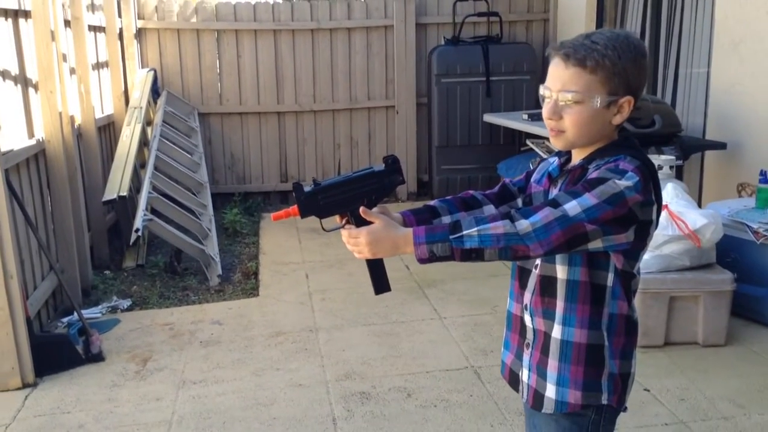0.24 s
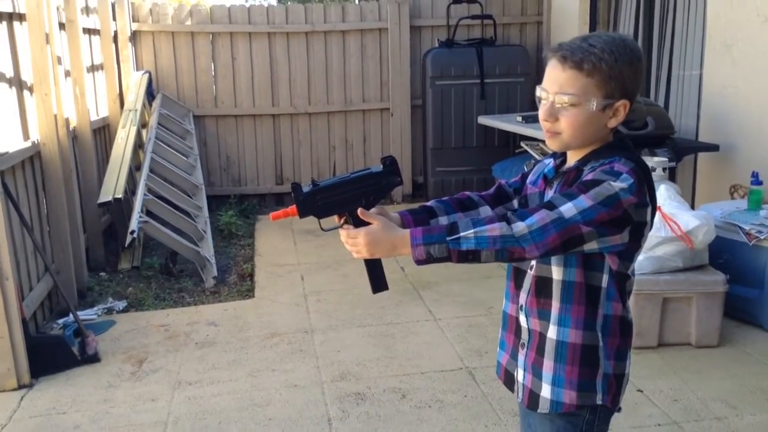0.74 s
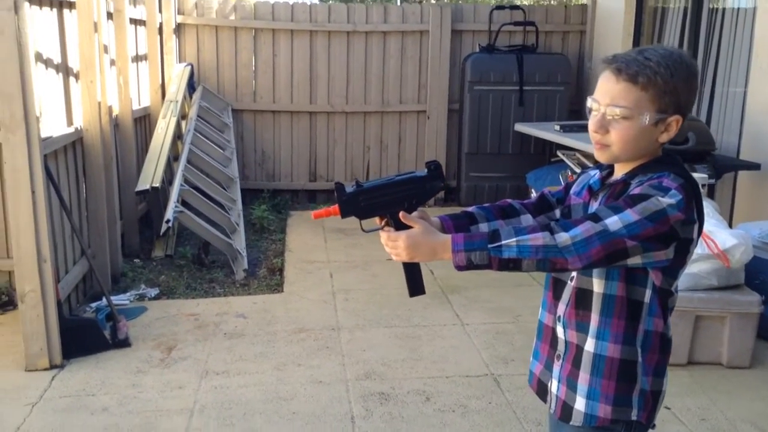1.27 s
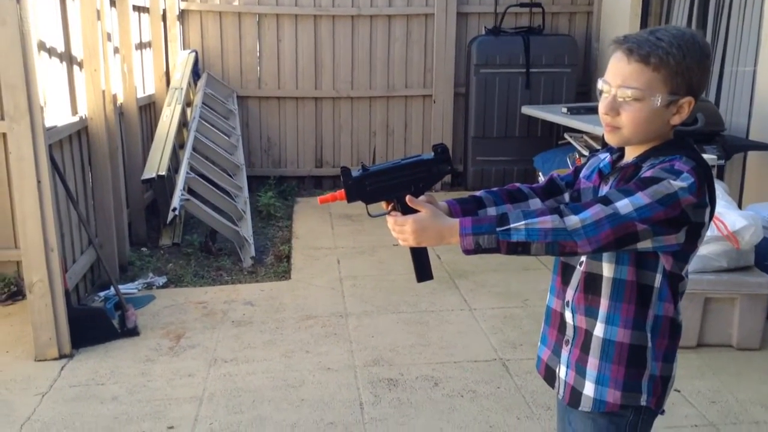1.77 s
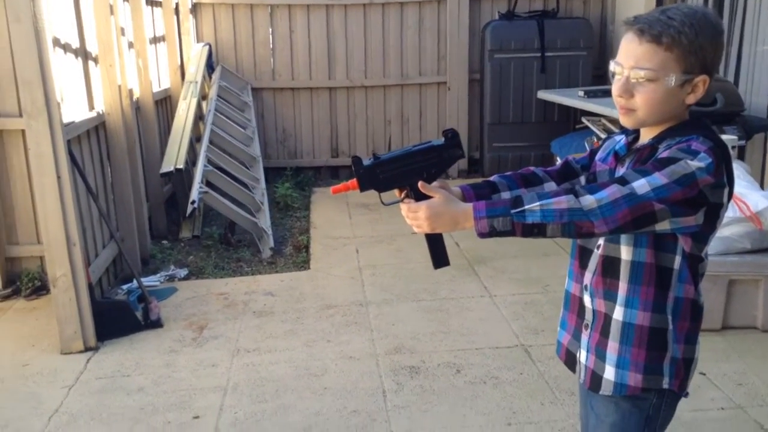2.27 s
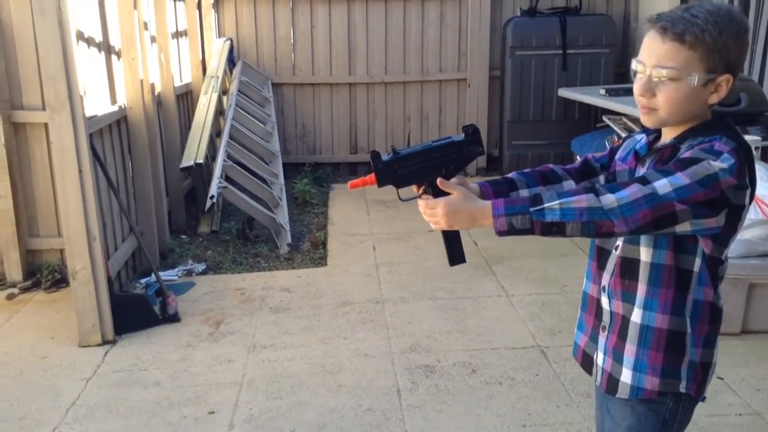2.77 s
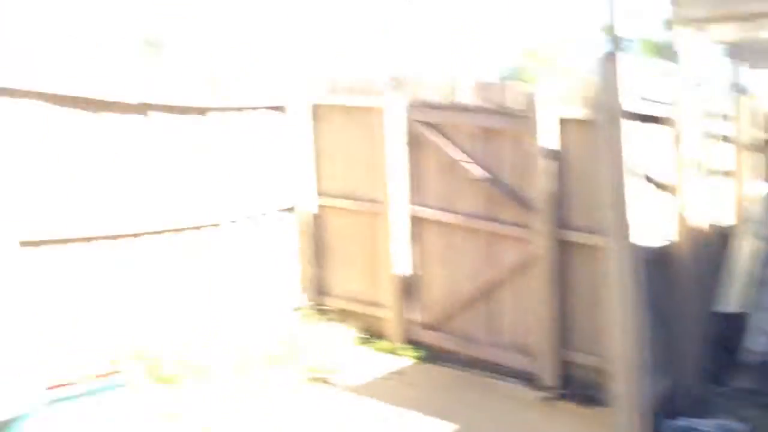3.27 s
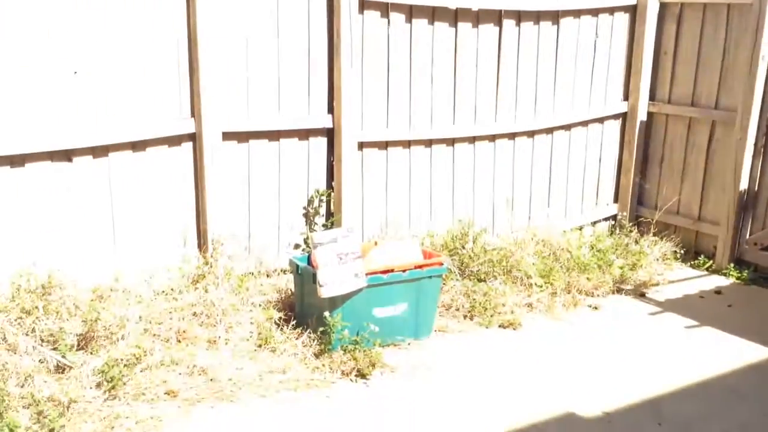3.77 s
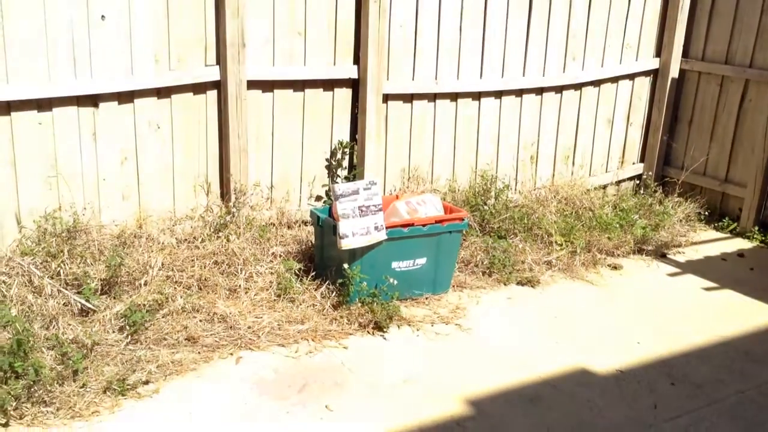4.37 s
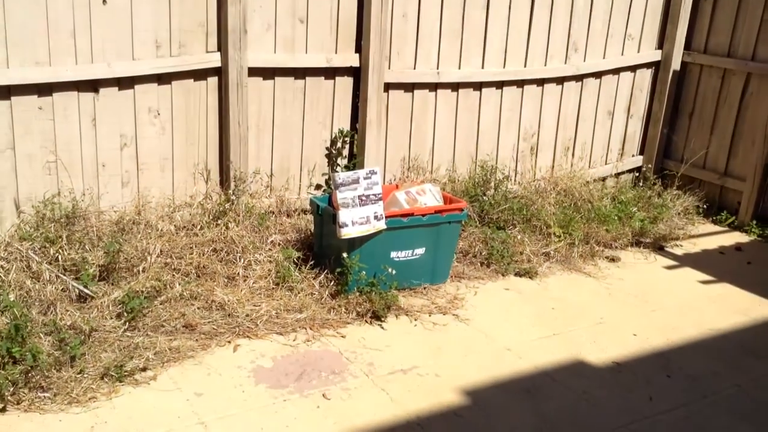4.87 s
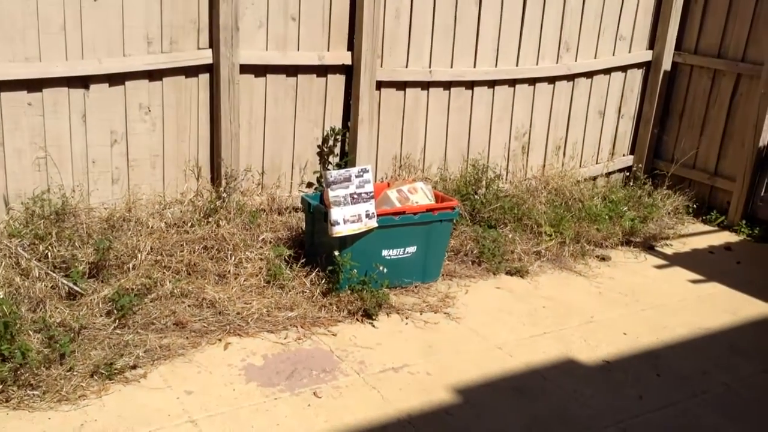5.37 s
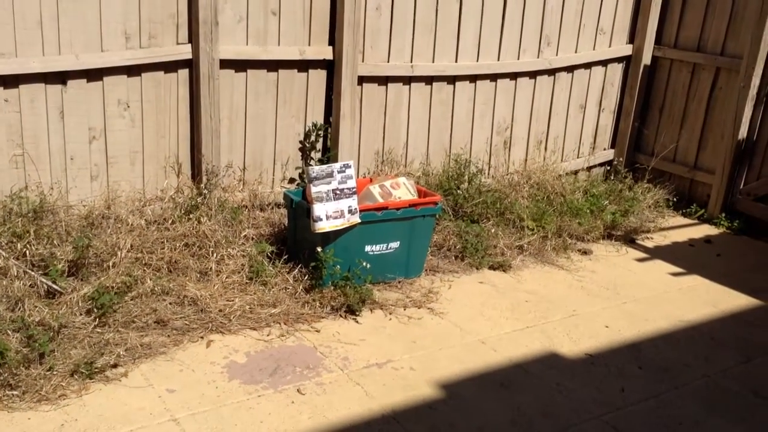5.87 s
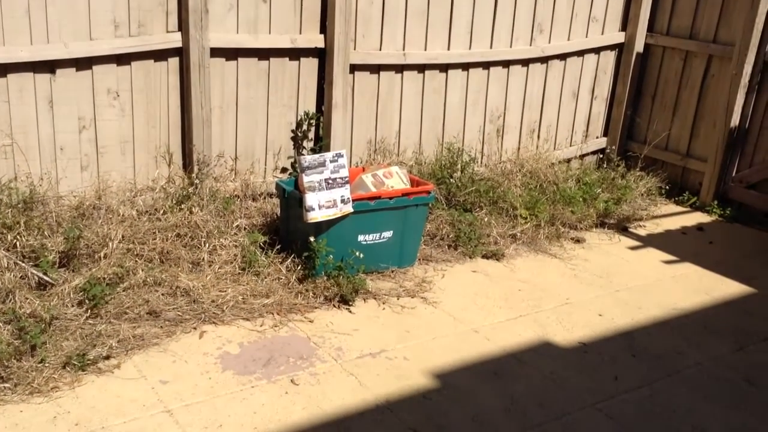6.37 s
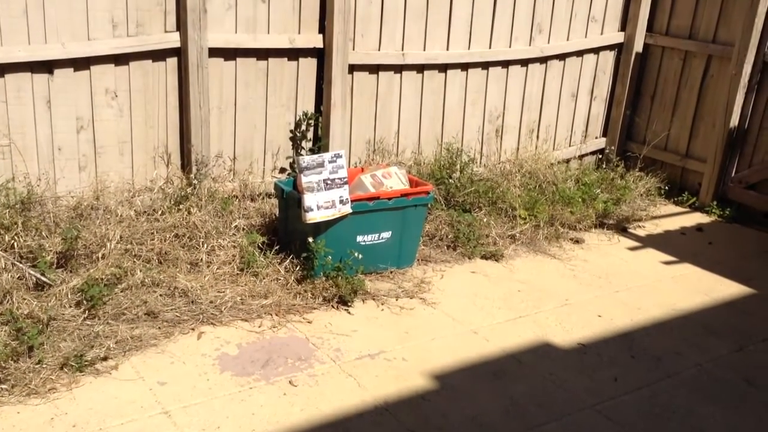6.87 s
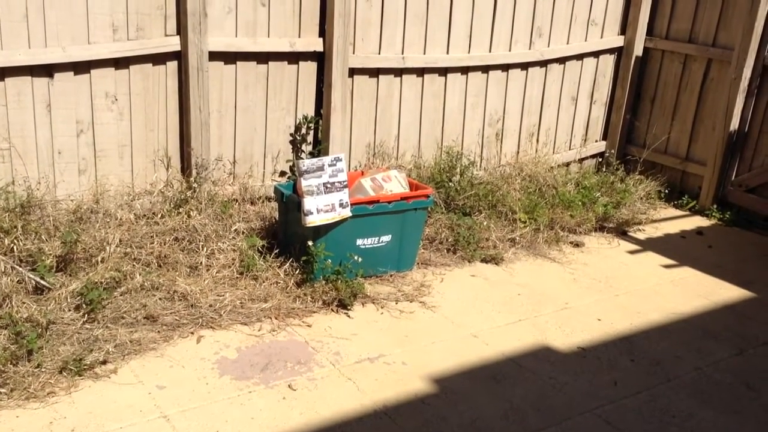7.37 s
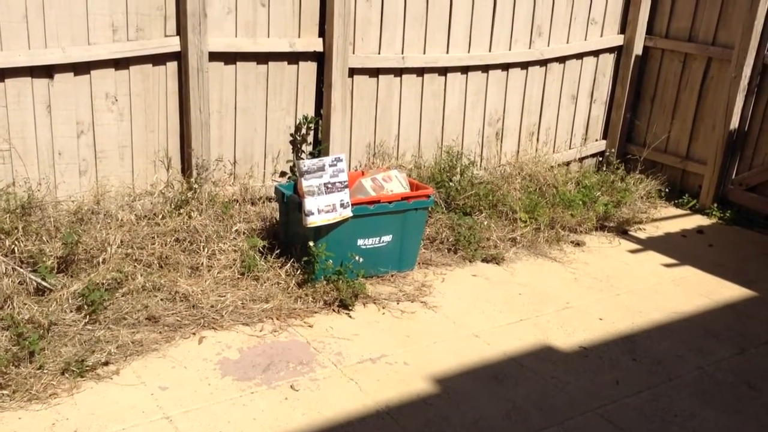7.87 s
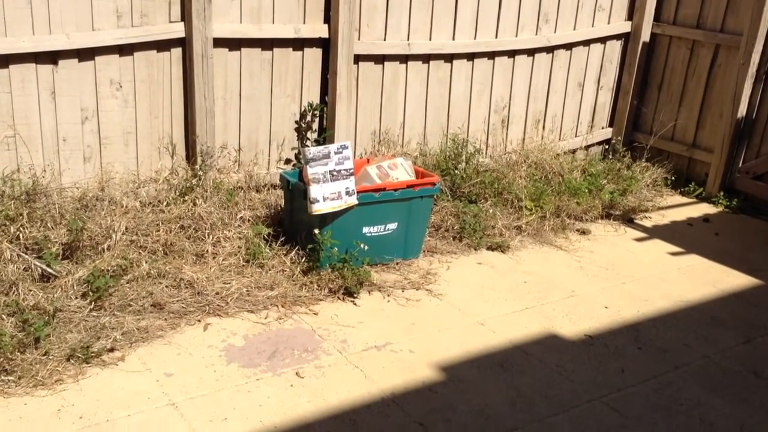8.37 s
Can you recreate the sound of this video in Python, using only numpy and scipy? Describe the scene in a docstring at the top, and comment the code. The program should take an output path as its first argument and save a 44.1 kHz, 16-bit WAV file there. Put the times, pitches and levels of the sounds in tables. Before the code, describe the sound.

An electric toy pellet gun rattles through a long full-auto burst, pauses with small ticks and a shoe scuff, then fires a shorter burst outdoors.

```python
"""A fenced, paved yard, a mono phone close to an electric airsoft gun, far traffic humming underneath.
The first full-auto burst runs about 9.5 shots a second: gears whine and rasp as they draw the piston,
it lets go with a clack and slams home with a puff of air; now and then a rough stroke skips and grinds.
The phone turns away about two thirds through that burst. In the pause loose plastic ticks, a shoe scuffs
the paving and something squeaks faintly; then a shorter second burst. Fence and house wall answer it all."""
import sys
import numpy as np
from scipy import signal
from scipy.fft import rfft, irfft, next_fast_len
from scipy.io import wavfile
from scipy.ndimage import uniform_filter1d, minimum_filter1d, map_coordinates

SR = 44100
rng = np.random.default_rng(int(sys.argv[2]) if len(sys.argv) > 2 else 0)


def put_to_file(sound):
    """Save the sound as 16-bit audio at rate SR, in the file named by the first command-line argument."""
    columns = np.atleast_2d(sound).T  # one column per channel
    safe = np.clip(columns, -1, 1)
    whole_steps = np.round(safe * 32767)
    wavfile.write(sys.argv[1], SR, whole_steps.astype(np.int16))


N = 380141


def amp(db):
    """The amplitude factor of a level in dB."""
    return 10 ** (np.asarray(db) / 20)


def unit(x):
    """x scaled to an RMS of one."""
    return x / np.sqrt(np.mean(x ** 2) + 1e-20)


def along(points, hz):
    """Values of a (frequency [Hz], value) table, read on a log frequency axis."""
    f, v = np.transpose(points)
    return np.interp(np.log(hz + 1), np.log(f + 1), v)


def curves(rows, t):
    """Each column after the first, read at the times t."""
    s, *columns = np.transpose(rows)
    return [np.interp(t, s, column) for column in columns]


def wobble(rate):
    """A smooth random curve, rate knots a second."""
    knots = rng.standard_normal(int(N * rate / SR) + 4)
    return map_coordinates(knots, [np.arange(N) * rate / SR])


def causal(gain):
    """The minimum-phase response that has this gain, found by folding its cepstrum."""
    cepstrum = irfft(np.log(np.maximum(gain, 1e-6)))
    half = len(cepstrum) // 2
    cepstrum[1:half] *= 2
    cepstrum[half + 1:] = 0
    return np.exp(rfft(cepstrum))


def coloured(x, gain, size=8192):
    """x through a causal filter that keeps the power of white noise."""
    hz = np.fft.rfftfreq(size, 1 / SR)
    response = irfft(causal(unit(gain(hz))))
    return signal.fftconvolve(x, response)[:len(x)]


def shape(points):
    """The gain of a (frequency [Hz], relative level [dB]) spectrum."""
    return lambda hz: amp(along(points, hz))


def add(track, s, sound):
    """Lay a sound into the track at s seconds."""
    part = track[max(round(s * SR), 0):][:len(sound)]
    part += sound[:len(part)]


def blend(same, fresh, share):
    """A repeating pattern with a share of new chance in its power."""
    share = np.clip(share, 0, 1)
    return np.sqrt(1 - share) * same + np.sqrt(share) * fresh


# the phone swings away from the gun: (time [s], share of the turn [0 to 1])
PHONE_TURN = [(3.1, 0.046), (3.35, 1)]


def turned_away(t):
    """How far the phone has turned from the gun at the times t."""
    return curves(PHONE_TURN, t)[0]


# soft outdoor rush: (frequency [Hz], relative level [dB per Hz])
RUSH_SPECTRUM = [(30, -39), (90, -18), (130, -3.5), (190, -2.5), (330, -4.5), (700, -0.5), (1200, -7.5),
                 (2100, -16.5), (4000, -11), (7000, -22), (10000, -33), (15000, -41)]
# far traffic: (frequency [Hz], relative level [dB per Hz])
TRAFFIC_SPECTRUM = [(60, -33), (105, -14.5), (140, -3), (190, 0.5), (270, -5.5), (400, -12), (900, -42)]


def background():
    """The soft rush of the neighbourhood over the hum of far traffic, each a slowly swaying noise."""
    noise = lambda points: unit(coloured(rng.standard_normal(N), shape(points)))
    rush = amp(-51.5 + 0.89 * wobble(4)) * noise(RUSH_SPECTRUM)
    traffic = amp(-61.0 + wobble(1.9)) * noise(TRAFFIC_SPECTRUM)
    return rush + traffic


# the trigger is held: (motor on [s], first slam [s], motor off [s])
TRIGGER_PULLS = [(0, .0143, 4.88), (6.36, 6.392, 8.65)]
# the motor's pace drifts a little: (time [s], rate [shots per s])
SHOT_RATE = [(0, 9.613), (.9, 9.549), (1.6, 9.601), (3.2, 9.555), (4.8, 9.544), (6.39, 9.306), (6.6, 9.525),
             (8.2, 9.449), (8.5, 9.61)]


def slam_times():
    """One slam for each turn of the sector gear while the trigger is held."""
    times = []
    for _, s, off_s in TRIGGER_PULLS:
        while s < off_s:
            times.append(s)
            s += 1 / curves(SHOT_RATE, s)[0]
    return np.array(times)


# rough strokes: gear skips, a slam that knocks the frame (2.098), and the second burst's first
# release (6.36); levels relative: (time [s], clack [dB], grinding [dB], low knock [dB],
# change of the gears just before it [dB])
ROUGH_STROKES = [(.093, -5, -3.5, -35, -1.5), (1.344, 4.5, -2, -27, -2.5), (1.448, -2, -5, -35, -3),
                 (1.551, 3, -3.5, -33, -2), (1.657, -1, -5, -36, -4.5), (1.76, -4, 0, -35, -4),
                 (1.974, -1.5, -16, -37, 0.5), (2.077, 0, -8, -36.5, -5.5), (2.098, -6, -12, -37, 2.5),
                 (2.183, -7, -16, -64, -0.5), (3.223, 4.5, -7, -33.5, -3), (6.36, -3.5, -13, -33.5, 0),
                 (6.466, -9, -2.5, -49, -4.5), (8.394, 0.5, -3, -48, -4.5)]
RUN_DOWN_DB_PER_S = 285  # the gears fade when the trigger is let go
CHANGE_S = .075  # how long before a rough stroke the gears' level changes


def motor_gain(t):
    """The gears sound while the trigger is held, run down after, and change level before rough strokes."""
    running = 0
    for on_s, _, off_s in TRIGGER_PULLS:
        running = running + (t >= on_s) * amp(-RUN_DOWN_DB_PER_S * np.maximum(t - off_s, 0))
    change_db = sum(db * ((t > s - CHANGE_S) & (t < s)) for s, *_, db in ROUGH_STROKES)
    return running * amp(change_db)


# modes of gearbox and plastic shell, levels relative:
# (centre [Hz], width [Hz], driven by the release [dB], by the slam [dB], by the gears [dB])
SHELL_MODES = [(360, 360, -18.5, -23.5, -25), (563, 78, -16, -8, -32), (812, 450, -10, -10, -17.5),
               (1010, 256, -10.5, -5.5, -14), (1302, 460, -19, -12.5, -14.5), (1630, 400, -7, -11.5, -14.5),
               (1890, 370, -5.5, -10.5, -17), (2327, 590, -5, -6.5, -8.5), (2682, 240, 0, -13.5, -8.5),
               (3126, 790, -18.5, -2, -7), (3350, 340, 3, -26, -12), (3617, 166, -5.5, 0, 1),
               (4240, 790, -2, -2.5, -5), (3946, 126, 0, -9.5, -0.5), (4586, 1100, -20, -2.5, -10.5),
               (5250, 300, -2.5, -5.5, -20), (5770, 360, -0.5, -1, -29), (5710, 2330, -18, -7, -10),
               (6840, 580, -3, -8, -19), (7330, 460, -29, -5, -13), (9160, 950, -18, -13, -31),
               (9490, 340, -22, -25, -16), (10500, 2100, -15.5, -13, -32.5), (12160, 680, -9, -9.5, -25),
               (14000, 430, -23, -14, -42), (14700, 1100, -19, -16, -36)]


def shell(drive, lowest_hz=170):
    """The gain of the shell's modes under one kind of drive; so small a body radiates little bass."""
    centre, width, *levels = np.transpose(SHELL_MODES)
    db = dict(zip(("release", "slam", "gears"), levels))[drive]

    def gain(hz):
        f = hz[:, None] + 1
        detune = (f * f - centre ** 2) / (f * width)
        modes = np.linalg.norm(amp(db) / (1 + detune ** 2), axis=1)
        return modes * hz ** 2 / (hz ** 2 + lowest_hz ** 2)
    return gain


# one draw of the piston, levels relative:
# (time after the slam [s], whine pitch [Hz], whine [dB], mesh [dB], rack rasp [dB])
PISTON_DRAW = [(0, 4100, -41, -18.5, -17.5), (.009, 3890, -20, -23.5, -26.5), (.02, 3880, -17.5, -22, -25),
               (.04, 4040, -18.5, -19.5, -25), (.058, 4230, -22, -21.5, -48), (.068, 4150, -39, -24.5, -63),
               (.084, 4050, -20, -23, -35), (.105, 4100, -31, -21.5, -25)]
# rack teeth sliding: (frequency [Hz], relative level [dB per Hz])
RASP_SPECTRUM = [(300, -32.5), (3000, -6), (5000, -18), (6000, 8), (7300, 5.5), (8100, -1.5), (9400, -0.5),
                 (11400, -7), (12300, 1.5), (13600, -11), (15000, -21)]
# the shaken frame: (frequency [Hz], relative level [dB per Hz])
KNOCK_SPECTRUM = [(50, -52), (150, -21.5), (240, 0.5), (350, -7.5), (470, 3.5), (560, 3), (800, -10),
                  (2000, -44.5)]


def gears(fresh=0.4, shaft_hz=228, shaft_db=-1.5, tooth_db=2, cycle_s=.1055, slop_s=.00012,
          flutter_rad=1.15, frame_fresh=0.11):
    """The same teeth meet in every cycle, so the same rattle repeats; the spring's load bends the whine."""
    n = np.arange(N)
    t = n / SR
    starts = np.round(slam_times() * SR).astype(int)
    latest = np.maximum(np.searchsorted(starts, n, "right") - 1, 0)
    since = n - starts[latest]
    # play in the gear train makes each draw run a little early or late
    step = np.round(since + slop_s * SR * wobble(25)).astype(int) % round(cycle_s * SR)
    whine_hz, whine_db, mesh_db, rasp_db = curves(PISTON_DRAW, t)
    turned = turned_away(t)
    # the pinion bites harder once a turn, and every tooth has its own size
    bite = unit(amp(shaft_db * np.sin(2 * np.pi * shaft_hz * t) + tooth_db * wobble(1800)))
    # each side of the gun has its own rattle
    repeating = lambda pattern: blend(pattern()[step], pattern()[step], turned)
    hiss = lambda: rng.standard_normal(N)
    teeth = lambda db, share=fresh: (bite * amp(db))[step] * blend(repeating(hiss), hiss(), share)

    mesh = coloured(teeth(mesh_db), shell("gears"))
    rasp = coloured(teeth(rasp_db), shape(RASP_SPECTRUM))
    frame = coloured(teeth(mesh_db, frame_fresh), shape(KNOCK_SPECTRUM)) * amp(-27.5 - 3.5 * turned)

    # uneven teeth roughen the whine in level and phase
    flutter = lambda: unit(amp(4.8 * wobble(260))) * np.exp(1j * flutter_rad * wobble(480))
    tone = bite * amp(whine_db) * np.exp(2j * np.pi * np.cumsum(whine_hz) / SR)
    drifting = flutter() * np.exp(2j * wobble(40))
    whine = (tone[step] * blend(repeating(flutter), drifting, fresh)).real
    return motor_gain(t) * (amp(-0.5) * mesh + amp(-2.5) * rasp + amp(-1.5) * whine + frame)


def chatter(t60, rise_s=0.00045, size=2048):
    """One contact, scattered in time inside the gearbox but nearly flat in spectrum."""
    t = np.arange(size) / SR
    envelope = amp(-60 * t / t60) * (1 - np.exp(-t / rise_s))
    z = rfft(rng.standard_normal(size) * envelope)
    burst = irfft(z / abs(z)) * np.sqrt(envelope)
    return burst / np.linalg.norm(burst)


# colour of the blows while the phone faces the gun: (frequency [Hz], relative level [dB])
FACING_COLOUR = [(300, -2), (430, -1.5), (560, -6), (720, 1.5), (900, -4.5), (1400, 0.5), (3200, -1.5),
                 (3900, 7), (5000, 0), (6300, 0.5), (7000, -4.5), (8700, 7.5), (10700, -10.5),
                 (12200, -13.5), (14800, 0.5)]


def blows(rows, drive, t60, fresh, bounce_s, bounce_db):
    """Nearly alike contacts that ring the shell, each followed by its bounce off the paving."""
    facing, away = np.zeros(N), np.zeros(N)
    facing_pattern, away_pattern = chatter(t60), chatter(t60)
    for s, db in rows:
        turned = turned_away(s)
        facing_blow = blend(facing_pattern, chatter(t60), fresh)
        away_blow = blend(away_pattern, chatter(t60), fresh)
        add(facing, s, amp(db) * np.sqrt(1 - turned) * facing_blow)
        add(away, s, amp(db) * np.sqrt(turned) * away_blow)
    contacts = amp(-1.5) * coloured(facing, shape(FACING_COLOUR)) + away
    direct = coloured(contacts, shell(drive))
    bounce = np.zeros(N)
    add(bounce, bounce_s, signal.fftconvolve(direct, chatter(0.0034))[:N])
    return direct + amp(bounce_db) * bounce


# air from the muzzle: (frequency [Hz], relative level [dB per Hz])
PUFF_SPECTRUM = [(15, -9), (30, 0), (90, 1.5), (160, -3), (300, -9), (600, -43)]


def puffs(rows):
    """The air that each stroke of the piston pushes out of the muzzle."""
    pushes = np.zeros(N)
    for s, db in rows:
        add(pushes, s, amp([db]))
    return amp(25) * coloured(pushes, shape(PUFF_SPECTRUM))


FLIGHT_S = .0204  # the piston flies from its release to the cylinder head
RELEASE_SCATTER_DB, SLAM_SCATTER_DB, PUFF_SCATTER_DB = 1.05, 2.4, 2  # from shot to shot
THUMP_DB = -46  # relative level of a felt puff, on the scale of the ordinary puffs
SAME_SHOT_S = .04  # events this near a slam belong to it
# strength of an ordinary shot, levels relative: (time [s], release [dB], slam [dB], air puff [dB])
SHOT_STRENGTH = [(0, -6, 3, -55), (1.8, -6.5, 2.5, -60), (3.1, -6.5, .5, -58), (3.5, -4.5, 2.5, -55),
                 (4.8, -7.5, 2.5, -57), (6.8, -5.5, 1, -56), (8.5, -7, -1.5, -48)]
# shots whose puff of air is felt as a thump: (time [s])
THUMP_TIMES = [.33, .43, .74, 1.16, 1.68, 1.89, 2.62, 3.04, 3.46, 4.72, 6.5, 7.34, 7.76, 8.4]


def piston():
    """In each shot: the clack of the release, the sharper slam 20 ms later, and a puff from the muzzle."""
    slam_s = slam_times()
    scatter = [RELEASE_SCATTER_DB, SLAM_SCATTER_DB, PUFF_SCATTER_DB]
    scatter_db = rng.standard_normal((len(slam_s), 3)) * scatter
    release_db, slam_db, puff_db = np.array(curves(SHOT_STRENGTH, slam_s)) + scatter_db.T
    rough = np.array(ROUGH_STROKES)[:, :2]
    among = lambda times: abs(slam_s[:, None] - times).min(axis=1) < SAME_SHOT_S
    puff_db = np.where(among(THUMP_TIMES), THUMP_DB, puff_db)
    # the clack of a rough stroke takes the place of the ordinary release
    clean = ~among(rough[:, 0]) & (slam_s > FLIGHT_S)
    ordinary = np.column_stack([slam_s - FLIGHT_S, release_db])[clean]
    releases = np.vstack([ordinary, rough])
    clack = blows(releases, "release", t60=0.013, fresh=0.28, bounce_s=0.0047, bounce_db=-10)
    slam = blows(zip(slam_s, slam_db), "slam", t60=0.0059, fresh=0.33, bounce_s=.0044, bounce_db=-12.0)
    return amp(17.0) * clack + amp(14.5) * slam + puffs(zip(slam_s, puff_db))


# the clear tone of the gear mesh in each draw: its start after the slam, and its length
SING_START_S, SING_S = .012, 0.058
SING_HZ, SING_RISE_HZ_PER_S = 3720, 10000  # starting pitch and glide
SING_DB, SING_AWAY_DB = -27, 5  # its level, and the change once the phone has turned


def singing(sideband=0.83, shaft_hz=228, waver_rad=0.46):
    """The pinion's mesh tone with sidebands from the turning shaft; the motor gains speed in each draw."""
    track, t = np.zeros(N), np.arange(round(SING_S * SR)) / SR
    swell = np.sin(np.pi * t / SING_S) ** 0.73
    mesh = 2 * np.pi * (SING_HZ * t + SING_RISE_HZ_PER_S * t ** 2 / 2)
    slam_s = slam_times()
    phases = rng.uniform(0, 2 * np.pi, (len(slam_s), 2))
    for s, (tooth, shaft) in zip(slam_s, phases):
        turning = 1 + sideband * np.cos(2 * np.pi * shaft_hz * t + shaft)
        add(track, s + SING_START_S, swell * np.sin(mesh + tooth) * turning)
    now = np.arange(N) / SR
    analytic = signal.hilbert(track, next_fast_len(N))[:N]
    wavering = (analytic * np.exp(1j * waver_rad * wobble(250))).real
    return motor_gain(now) * amp(SING_DB + SING_AWAY_DB * turned_away(now)) * wavering


def grinding(rattle_t60=0.21, knock_t60=0.46, size=12000):
    """Each rough stroke rattles the shell and shakes the whole frame with fading, grainy noise."""
    rattle, knock, t = np.zeros(N), np.zeros(N), np.arange(size) / SR
    for s, _, db, knock_db, _ in ROUGH_STROKES:
        add(rattle, s, amp(db - 60 * t / rattle_t60))
        add(knock, s, amp(knock_db - 60 * t / knock_t60))
    grains = lambda: unit(rng.standard_normal(N) * amp(3.4 * wobble(600)))
    shell_rattle = coloured(rattle * grains(), shell("slam"))
    frame_knock = coloured(knock * grains(), shape(KNOCK_SPECTRUM))
    return amp(-13.5) * shell_rattle + amp(-3) * frame_knock


# loose plastic parts settle: (time [s], relative level [dB])
SETTLING_TICKS = [(4.978, -20), (5.18, -34), (5.2455, -38), (5.883, -35), (5.96, -38)]


def ticks():
    """Small plastic contacts ring the shell while the gun rests."""
    track = np.zeros(N)
    for s, db in SETTLING_TICKS:
        add(track, s, amp(db) * chatter(0.0306))
    return amp(13) * coloured(track, shell("release"))


RUB_RISE_DB_PER_S, RUB_FALL_DB_PER_S = 327, 139
# the sole pushes over the grit: (time of the peak [s], level [dB])
SOLE_RUBS = [(5.25, -40.5), (5.33, -31.5), (5.398, -27.5), (5.485, -29.5), (5.534, -27.5), (5.662, -34.5),
             (5.888, -48), (6.0, -54)]
# grit under the sole: (frequency [Hz], relative level [dB per Hz])
GRIT_SPECTRUM = [(710, -53), (1200, -17), (1590, -21), (2030, -15), (2480, -5.5), (3730, -4.5), (4200, 0),
                 (4980, -4), (5310, 0), (6370, -5.5), (7090, -2), (8600, -12.5), (12500, -11), (15500, -21)]


def scuff(grain_db=3.0, slip_db=1.5):
    """Grit catches and slips under a sole; each push swells fast and fades more slowly."""
    t = np.arange(N) / SR
    push = lambda s, db: db - np.maximum(RUB_RISE_DB_PER_S * (s - t), RUB_FALL_DB_PER_S * (t - s))
    level_db = np.max([push(s, db) for s, db in SOLE_RUBS], axis=0)
    grains = rng.standard_normal(N) * amp(grain_db * wobble(2500) + slip_db * wobble(130))
    return amp(level_db) * unit(coloured(grains, shape(GRIT_SPECTRUM)))


# thin tones of a faint squeak: (time [s], length [s], pitch [Hz], level [dB], waver [rad])
SQUEAK_TONES = [(6.13, 0.046, 3720, -53, .6), (6.138, 0.092, 2300, -52, 1.6), (6.138, .1, 4210, -51, 0.9),
                (6.264, .1, 3340, -58, .3)]


def squeak(waver_rate=330):
    """A few thin tones, unsteady in phase, that swell and fade."""
    t, track = np.arange(N) / SR, np.zeros(N)
    for s, length, hz, db, waver in SQUEAK_TONES:
        swell = np.sqrt(abs(np.sin(np.pi * np.clip((t - s) / length, 0, 1))))
        track += amp(db) * swell * np.sin(2 * np.pi * hz * t + waver * wobble(waver_rate))
    return track


# decay of the yard's echoes: (frequency [Hz], time to fall by 60 dB [s])
YARD_DECAY = [(200, 0.095), (1000, 0.77), (4000, 0.43), (8000, 0.32), (15000, 0.36)]


def yard(x, delay_s=.008):
    """Fence and house wall scatter the sound back; lows die first, and treble dies before the mids."""
    hz, t, z = signal.stft(rng.standard_normal(SR // 2), SR, nperseg=256)
    fading = z * amp(-60 * t / along(YARD_DECAY, hz)[:, None])
    tail = signal.istft(fading, SR, nperseg=256)[1]
    echo = np.zeros(N)
    add(echo, delay_s, signal.fftconvolve(x, tail / np.linalg.norm(tail))[:N])
    return echo


# colour of the gun once the phone has turned away: (frequency [Hz], relative level [dB])
AWAY_COLOUR = [(70, 1.5), (190, -5), (295, 4.5), (400, -3.5), (480, -4.5), (560, 1), (720, -2), (1000, 0),
               (1800, 0), (3100, -1), (3800, -0.16), (6000, 1), (12000, -0.5)]


def scene():
    """The gun and the small sounds near it, heard directly and off the fences, alike in both channels."""
    turned = turned_away(np.arange(N) / SR)
    gun = gears() + piston() + singing() + grinding() + ticks()
    gun = (1 - turned) * gun + turned * amp(-0.15) * coloured(gun, shape(AWAY_COLOUR))
    near = gun + scuff() + squeak()
    echoes = blend(yard(near), yard(near), turned)  # the turned phone hears other echoes
    mono = near + amp(-8.5) * echoes + background()
    return np.array([mono, mono])


def record(dry, hold_s=0.0013, ceiling=.76, top_hz=15500):
    """The phone's limiter holds down the sharpest peaks; nothing is kept above its band limit."""
    span = 2 * max(round(hold_s * SR / 2), 1) + 1
    needed = np.minimum(1, ceiling / (abs(dry) + 1e-9))
    held = minimum_filter1d(needed, span, axis=-1)
    limited = dry * uniform_filter1d(held, span, axis=-1)
    m = next_fast_len(N + SR // 2)
    in_band = np.fft.rfftfreq(m, 1 / SR) < top_hz
    return irfft(rfft(limited, m) * in_band, m)[..., :N]


dry = scene()
out = record(dry)
put_to_file(out)
```